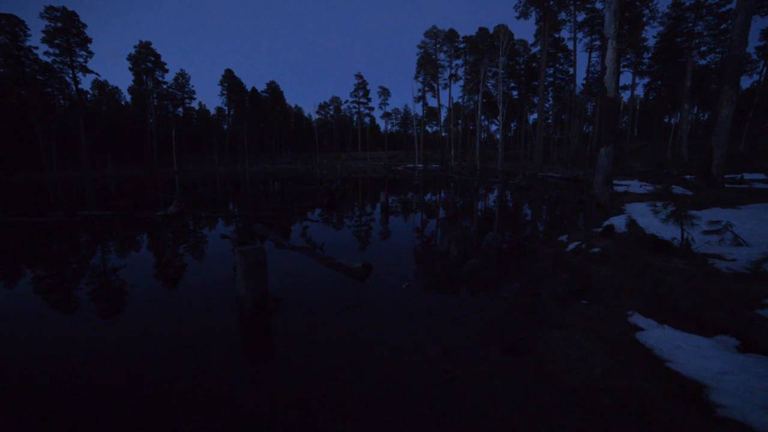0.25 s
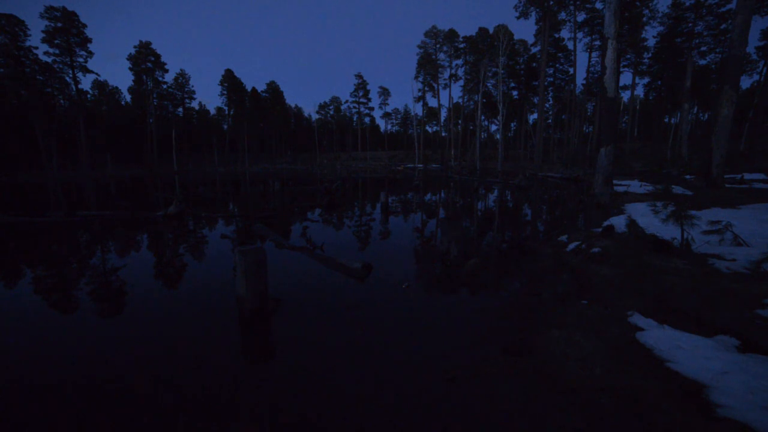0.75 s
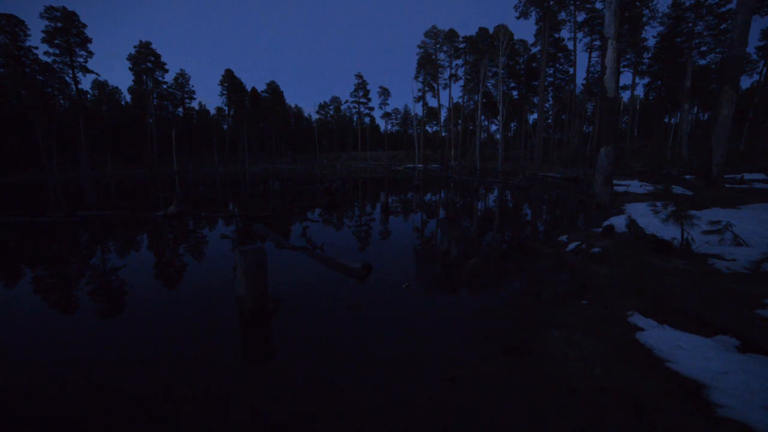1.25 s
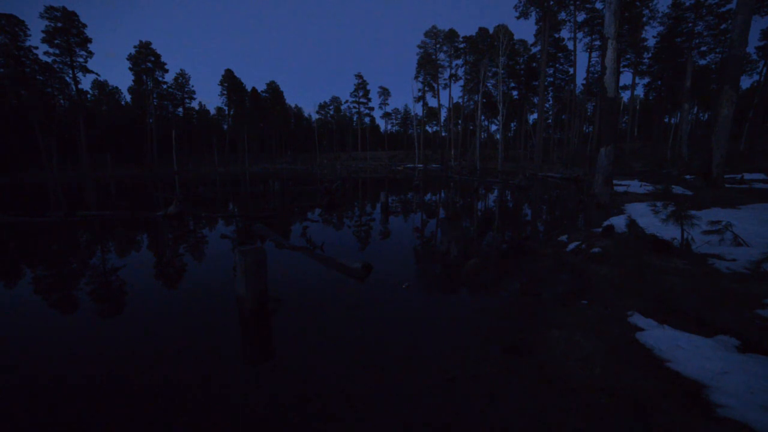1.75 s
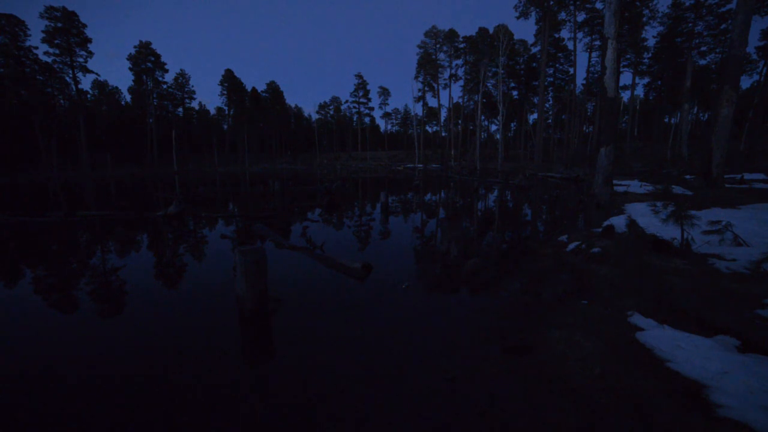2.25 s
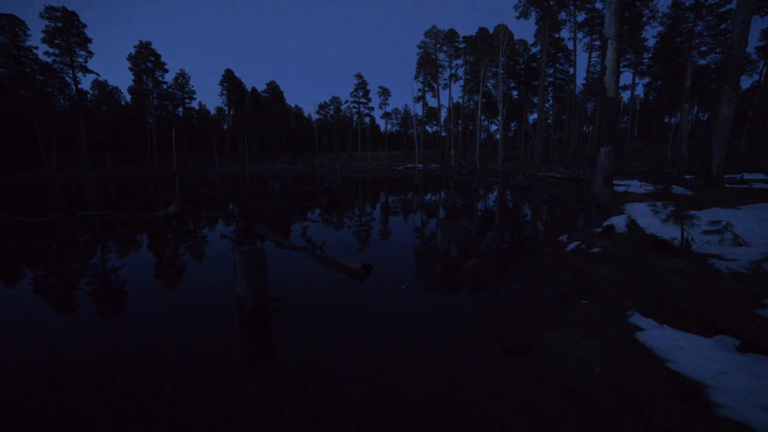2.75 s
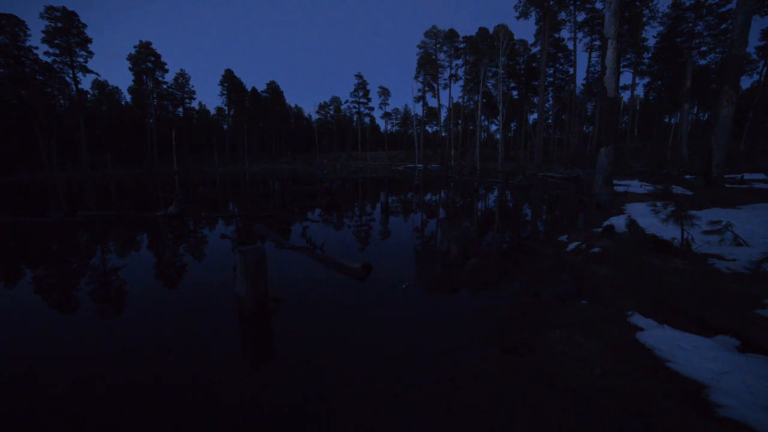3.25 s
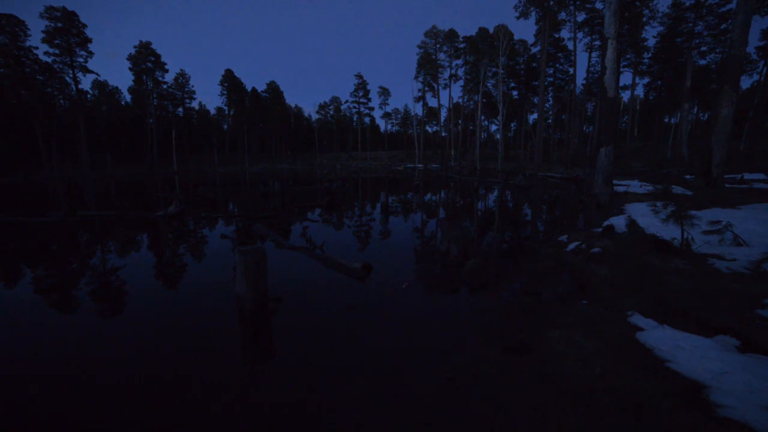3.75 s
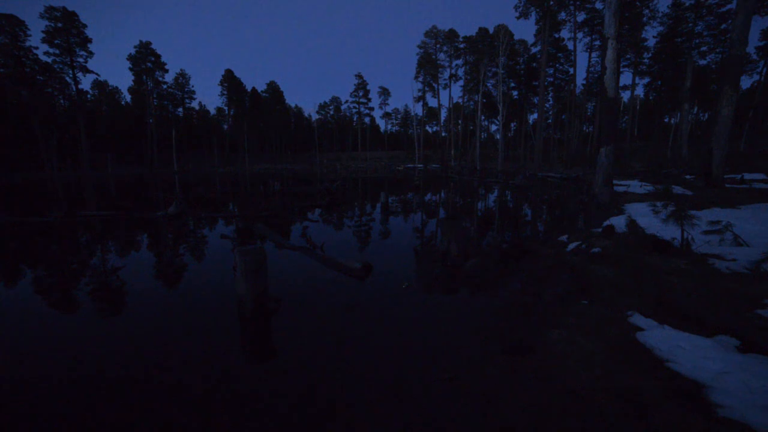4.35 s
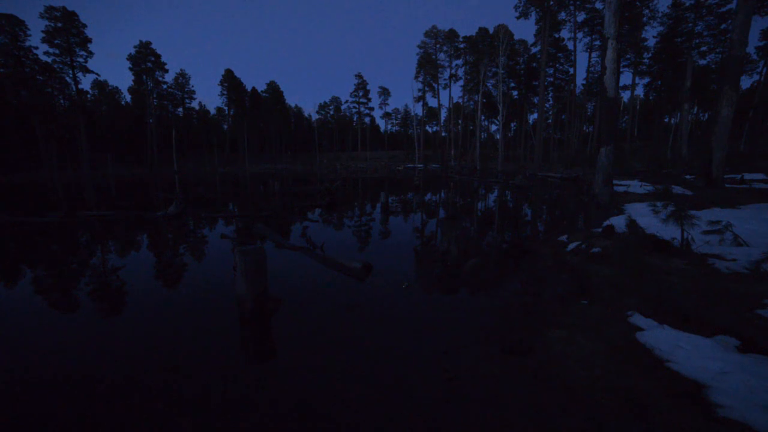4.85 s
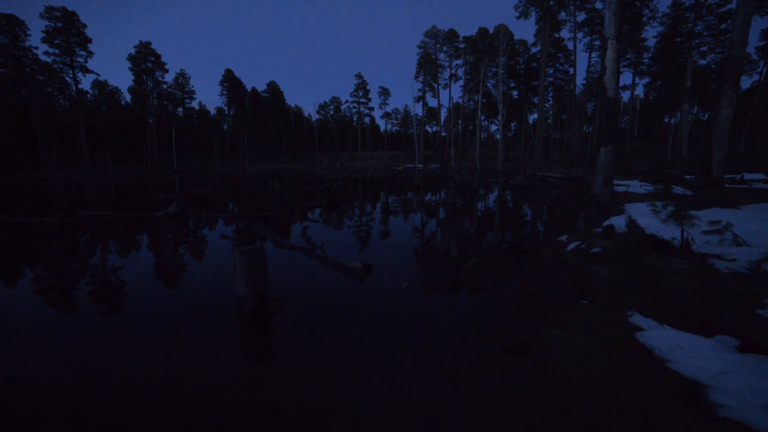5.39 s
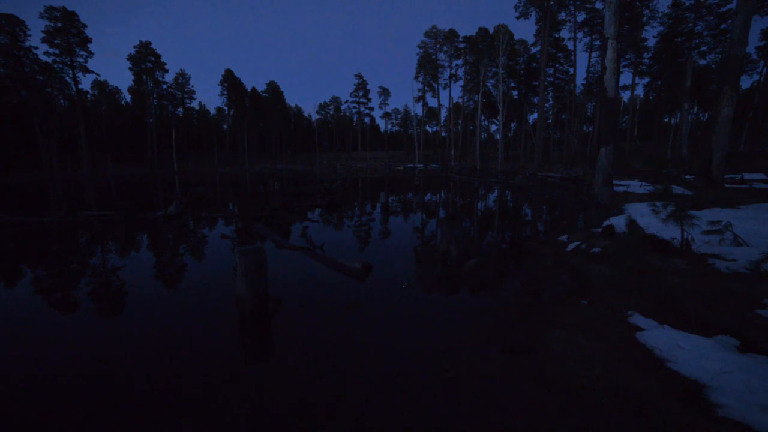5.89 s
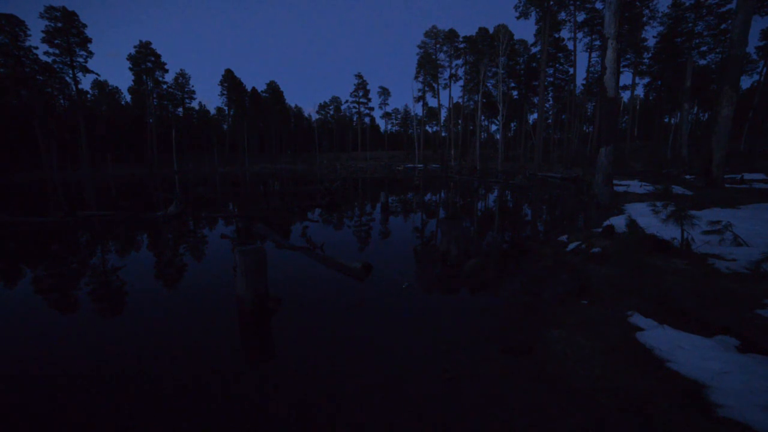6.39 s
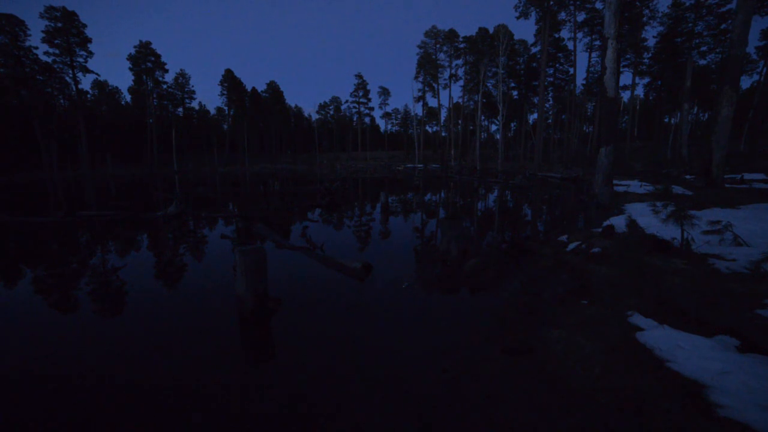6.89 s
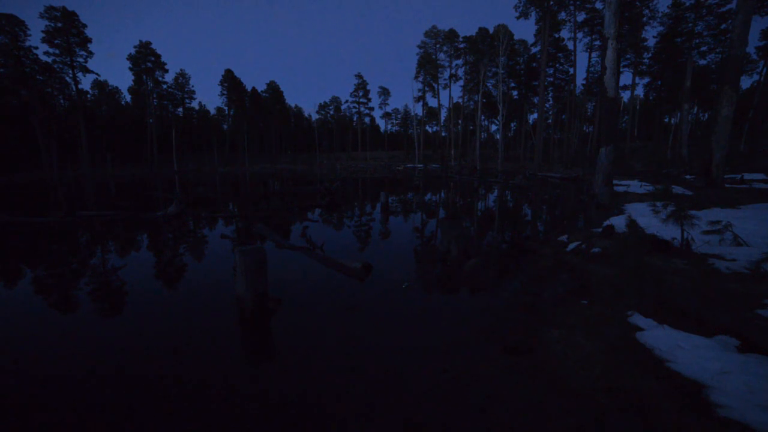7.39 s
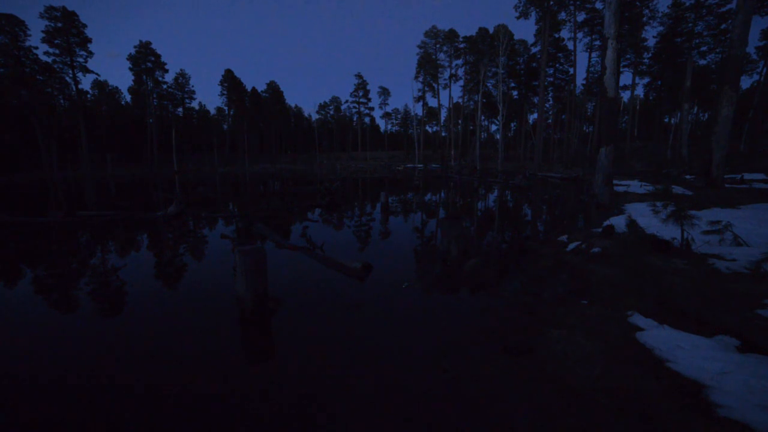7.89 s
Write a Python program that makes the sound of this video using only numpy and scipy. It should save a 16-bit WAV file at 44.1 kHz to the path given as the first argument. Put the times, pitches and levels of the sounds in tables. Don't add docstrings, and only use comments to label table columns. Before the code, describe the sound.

A crowd of small frogs around a forest pond trills continuously, their short piping pulses merging into a dense, high, grainy din. Nearer frogs overlap in trills that slow and rise in pitch, with sharp single peeps jumping out. Tree trunks return a soft echo. Very faint distant traffic and hiss lie beneath. Heard from a microphone on the bank.

```python
import sys
import numpy as np
from scipy import signal
from scipy.fft import rfft, irfft, next_fast_len
from scipy.io import wavfile
from scipy.ndimage import uniform_filter1d

SR = 44100
rng = np.random.default_rng(int(sys.argv[2]) if len(sys.argv) > 2 else 0)


def invert_db(level):
    return 10 ** (np.asarray(level, dtype=float) / 20)


def pcm_store(signal):
    levels = np.round(np.clip(np.atleast_2d(signal), -1, 1) * 32767)
    wavfile.write(sys.argv[1], SR, levels.astype(np.int16).T)


N = 358533

# time in seconds, level in dB, centre of the main band in Hz.
CROWD_CURVE = [(0.0, -26, 2470), (0.81, -26.5, 2470), (1.72, -26, 2480), (2.04, -24, 2487),
               (2.65, -26, 2546), (3.14, -27, 2455), (3.49, -25, 2520), (4.66, -26, 2461),
               (5.05, -23.5, 2523), (5.75, -25.5, 2489), (6.07, -25.5, 2454), (6.34, -24.5, 2490),
               (7.04, -26, 2497), (8.13, -25, 2482)]
BANKS = 14
TRILL_SLOWING = 0.2
NEAR_STRETCH = 1.68


def rms_one(x):
    return x / np.sqrt(np.mean(x ** 2) + 1e-20)


def in_time(rows):
    s, *columns = np.transpose(rows)
    return [np.interp(np.arange(N) / SR, s, column) for column in columns]


def coloured(spectrum):
    hz, db = np.transpose(spectrum)
    grid_hz = np.maximum(np.fft.rfftfreq(N, 1 / SR), 1)
    level_db = np.interp(np.log(grid_hz), np.log(hz), db, -60, db[-1])
    return rms_one(irfft(rfft(rng.standard_normal(N)) * invert_db(level_db), N))


def resonate(x, hz, width_hz):
    r = np.exp(-np.pi * width_hz / SR)
    b, a = [1, 0.0011, -1], [1, -2 * r * np.cos(2 * np.pi * hz / SR), r * r]
    return rms_one(signal.lfilter(b, a, signal.lfilter(b, a, x)))


def pulses(at_s, bank, gain, pitch_hz, upper_db, spread_db, droop, stretch=1):
    # band in Hz, level in dB, rise in ms, decay in ms, pitch scatter as a share.
    sac_bands = [
        (1240, -18, 0.63, 0.71, 0.11),
        (2470, -0.5, 0.59, 1.103, 0.026),
        (3706, -22.5, 0.73, 0.92, .06),
        (4980, -36.5, 1.1, 1.3, 0.011),
        (6200, -51, .5, 0.77, .05),
    ]
    ms = np.arange(560, dtype="f4") * np.float32(1000 / SR)
    bent_s = (ms - droop * np.log(np.cosh((ms - 4) / 3))) / 1000
    size = pitch_hz / sac_bands[1][0]
    draws = rng.standard_normal((len(at_s), len(sac_bands), 4))
    heard = (at_s > -ms[-1] / 1000) & (at_s < N / SR)
    at_s, bank, gain, size, draws = at_s[heard], bank[heard], gain[heard], size[heard], draws[heard]
    wave = 0
    for k, (hz, db, rise, decay, scatter) in enumerate(sac_bands):
        own_stretch = np.exp(0.099 * draws[:, 1, 2:3]).astype("f4")
        late = (ms - 4) / stretch * own_stretch + 0.6 * (k != 1)
        shape = np.where(late < 0, np.exp(-0.5 * (late / rise) ** 2), 1 / np.cosh(late / decay))
        tone_hz = hz * size * np.exp(1.472 * scatter * np.tanh(draws[:, k, 3]))
        phase = 2 * np.pi * (np.outer(tone_hz.astype("f4"), bent_s) + draws[:, k, 1:2].astype("f4"))
        level_db = db + (k != 1) * spread_db * draws[:, k, 0] + (k > 1) * upper_db
        band_gain = (gain * invert_db(level_db)).astype("f4")[:, None]
        wave = wave + band_gain * shape * np.sin(phase.astype("f4"))
    wave = wave * signal.windows.tukey(len(ms), 0.35)
    at = np.round(at_s * SR).astype(int)[:, None] + np.arange(len(ms))
    inside = (at >= 0) & (at < N)
    return np.bincount((at + N * bank[:, None])[inside], wave[inside], N * BANKS).reshape(BANKS, N)


def crowd(period_s=1.62, pulses_per_s=12.5, distance_db=1.73, size_spread=0.063, climb=0.096):
    frogs, calls_each, count = 110, 7, 11
    frog = rng.standard_normal((frogs, 4))[:, None, None, :]
    start = rng.random((frogs, 1, 1)) + np.arange(calls_each)[:, None] - 1
    start = start + 0.06 * rng.standard_normal((frogs, calls_each, 1))
    start_s = period_s * start * np.exp(0.05 * frog[..., 0])
    step = np.arange(count) / (count - 1)
    slip = rng.standard_normal((frogs, calls_each, count, 2))
    trill_s = count / pulses_per_s * np.exp(0.12 * frog[..., 1])
    at_s = start_s + trill_s * step * (1 - TRILL_SLOWING * (1 - step)) + 0.0015 * slip[..., 0]
    s, _, centre_hz = np.transpose(CROWD_CURVE)
    pitch_hz = np.interp(at_s, s, centre_hz)
    pitch_hz = pitch_hz * np.exp(size_spread * np.tanh(frog[..., 2]) + climb * (step - 0.6))
    gain = invert_db(distance_db * frog[..., 3] - 9.6 * (1 - step) ** 2 + 0.5 * slip[..., 1])
    bank = np.repeat(np.arange(frogs) % BANKS, calls_each * count)
    return pulses(at_s.ravel(), bank, gain.ravel(), pitch_hz.ravel(), 0, spread_db=1.5, droop=0.088, stretch=1.087)


def evened(x, over_s=0.22):
    return x / np.sqrt(uniform_filter1d(x ** 2, int(over_s * SR)) + 1e-12)


def dips_around(near_s, depth=0.6, dip_ms=3.0):
    marks = np.zeros(N)
    marks[np.clip(np.round((near_s - 0.001) * SR).astype(int), 0, N - 1)] = 1
    bell = np.exp(-0.5 * (np.arange(-999, 1000) / SR * 1000 / dip_ms) ** 2)
    return 1 - depth * np.minimum(signal.fftconvolve(marks, bell, "same"), 1)


def near_trills(upper_db=-3.7, count=12, climb_hz=148, uneven_db=2.5):
    # first pulse in seconds, last pulse in seconds, first pitch in Hz, peak in dB.
    nearest = [(0.168, 1.015, 2508, -13), (0.529, 1.4093, 2376, -16), (0.7256, 1.295, 2464, -11.5),
               (0.9907, 1.8644, 2330, -14), (1.2814, 2.035, 2367, -14), (1.4185, 2.214, 2340, -19.5),
               (1.6198, 2.5114, 2510, -16.5), (1.7872, 2.724, 2470, -19), (2.1078, 2.711, 2555, -16),
               (2.8064, 3.4473, 2364, -12.5), (3.2037, 3.9, 2386, -16.5), (3.357, 3.9248, 2376, -13),
               (3.378, 4.1835, 2490, -23), (3.6516, 4.5873, 2443, -15), (3.9158, 4.5086, 2330, -12),
               (4.5284, 5.141, 2390, -15.5), (4.7954, 5.5755, 2334, -11.5), (4.849, 5.8426, 2414, -20.5),
               (4.8975, 5.4003, 2467, -15.5), (5.086, 6.0543, 2460, -18), (5.3748, 6.4496, 2443, -13.5),
               (5.3786, 5.9131, 2440, -15), (6.1261, 6.6563, 2336, -19.5), (6.176, 6.7155, 2473, -14.5),
               (6.4173, 7.0682, 2350, -16), (6.5017, 7.2074, 2633, -18.5), (7.122, 7.7422, 2480, -13),
               (7.27, 7.9762, 2482, -12.5), (7.2752, 7.9801, 2490, -24), (7.3004, 8.0346, 2500, -17.5)]
    first, last, hz, db = np.transpose(nearest)[..., None]
    step = np.linspace(0, 1, count)
    s = (first + (last - first) * step * (1 - TRILL_SLOWING * (1 - step))).ravel()
    db = db - 3.0 + uneven_db * rng.standard_normal((len(nearest), count))
    bank = np.repeat(np.arange(len(nearest)) % BANKS, count)
    hz = (hz + climb_hz * step).ravel()
    return s, pulses(s - 0.004, bank, invert_db(db).ravel(), hz, upper_db, spread_db=0.5, droop=0.025,
                     stretch=NEAR_STRETCH)


def near_frogs():
    # time in seconds, peak in dB, pitch in Hz, upper bands in relative dB.
    loud_pulses = [(0.1019, -8.5, 2496, -34), (0.1427, -9, 2630, -25), (0.225, -16, 2390, -27.5),
                   (0.2331, -11, 2690, -36.5), (0.2541, -6.5, 2510, -34), (0.9457, -8.5, 2560, -34),
                   (1.0937, -12, 2540, -28), (1.4986, -13, 2490, -32), (1.8165, -9.5, 2485, -24),
                   (2.1534, -9.5, 2470, -34), (2.1742, -13, 2500, -33), (2.5453, -14.5, 2450, -28),
                   (3.3206, -11, 2530, -24), (3.5693, -8, 2470, -32), (4.0746, -13, 2465, -29),
                   (4.1585, -9, 2470, -30), (4.1683, -10.5, 2360, -37), (4.2096, -9, 2610, -36),
                   (4.322, -12, 2572, -26.5), (4.6513, -8.5, 2610, -26), (5.899, -8, 2466, -21.5),
                   (6.1184, -12, 2480, -23), (6.3248, -10, 2610, -27), (7.0142, -11, 2470, -32),
                   (7.0356, -13, 2480, -29.5), (7.5452, -15, 2480, -28), (7.9198, -13.5, 2440, -39),
                   (8.076, -8.5, 2495, -27), (8.0914, -12.5, 2660, -34), (8.1044, -15, 2540, -35)]
    s, peak_db, hz, upper_db = np.transpose(loud_pulses)
    bank = np.arange(len(s)) % BANKS
    return s, pulses(s - 0.004, bank, invert_db(peak_db - 3.1), hz, 0.5 * (upper_db + 23.5), spread_db=1.6,
                     droop=0.025, stretch=NEAR_STRETCH)


def soloists(bright_db=9):
    # first pulse in seconds, last pulse in seconds, pulses, first pitch in Hz, last pitch in Hz, level in dB.
    solos = [
        (1.537, 2.022, 6, 2750, 2940, -25.5),
        (2.257, 2.68, 6, 2540, 2590, -31.5),
        (3.309, 3.982, 9, 2720, 2710, -25.5),
        (4.898, 5.563, 9, 2660, 2930, -24),
        (2.683, 2.758, 3, 1950, 2030, -27.5),
        (6.341, 6.549, 6, 1980, 2070, -25.5),
        (7.862, 7.998, 4, 1950, 2070, -28),
    ]
    rows = [np.linspace((first, first_hz, db), (last, last_hz, db), round(count))
            for first, last, count, first_hz, last_hz, db in solos]
    s, hz, db = np.concatenate(rows).T
    return pulses(s - 0.002, np.arange(len(s)) % BANKS, invert_db(db), hz, bright_db, spread_db=0.0, droop=0.02)


def trees(banks, t60_s=0.95):
    s, size = np.arange(SR) / SR, next_fast_len(N + SR)
    tails = rng.standard_normal((BANKS, SR)) * invert_db(-60 * s / t60_s) * (s > 0.012)
    tails = signal.lfilter([1], [1, -0.6], tails)
    tails /= np.sqrt(np.mean(np.sum(tails ** 2, axis=1)))
    return irfft(np.sum(rfft(banks, size) * rfft(tails, size), axis=0), size)[:N]


def water_dip(x):
    dip_hz, width_hz, share, low_edge_hz = 1800, 330, 0.5, 925
    b, a = signal.iirpeak(dip_hz, dip_hz / width_hz, fs=SR)
    x = x - share * signal.lfilter(b, a, x)
    return signal.sosfilt(signal.butter(4, low_edge_hz, "high", fs=SR, output="sos"), x)


def high_caller(pitch_hz=4950, width_hz=320, pulses_per_s=150, edge_s=0.022):
    # start in seconds, end in seconds, first level in dB, last level in dB.
    high_calls = [
        (4.3, 4.462, -52, -54),
        (4.67, 4.829, -61, -49),
    ]
    clicks = (rng.random(N) < pulses_per_s / SR) + 0.051 * rng.standard_normal(N)
    s = np.arange(N) / SR
    calls = np.zeros(N)
    for start, end, first_db, last_db in high_calls:
        edges = np.clip(np.minimum(s - start, end - s) / edge_s + 1, 0, 1)
        calls += invert_db(np.interp(s, (start, end), (first_db, last_db))) * edges
    return calls * resonate(clicks, pitch_hz, width_hz)


def ticks():
    # time in seconds, peak in dB.
    twig_ticks = [
        (5.5628, -50),
        (7.8186, -44),
    ]
    clicks = np.zeros(N)
    for s, db in twig_ticks:
        clicks[round((s + 0.0015) * SR)] = invert_db(db + 18)
    return signal.sosfilt(signal.butter(3, [3500, 8500], "band", fs=SR, output="sos"), clicks)


def background():
    # frequency in Hz, density in dB per Hz.
    rumble_shape = [(60, -8.5), (100, 0.5), (190, 2.5), (260, -11), (400, -39.5), (900, -59.5), (2000, -93)]
    # time in seconds, level in dB.
    traffic_swell = [
        (0, -61.5),
        (1.2, -66.5),
        (3.1, -66),
        (3.5, -53.5),
        (3.85, -54.5),
        (4.1, -63),
        (7.2, -71),
        (7.7, -55.5),
        (8.13, -56),
    ]
    # frequency in Hz, density in dB per Hz.
    air_shape = [(25, -6), (45, -8.5), (120, 3), (300, -6), (700, -4), (1800, -1.5), (4500, -11.5),
                 (7000, -22.5), (11000, -25), (16000, -26)]
    s = np.arange(N) / SR
    hum_db = -61.5 - 1.5 * s
    drone_peak_s = 3.4
    drone_db = -60.5 - np.maximum(5.5 * (drone_peak_s - s), 2.5 * (s - drone_peak_s))
    hum = invert_db(hum_db) * resonate(rng.standard_normal(N), 100.6, 4)
    drone = invert_db(drone_db) * resonate(rng.standard_normal(N), 329, 62)
    swell = invert_db(in_time(traffic_swell)[0]) * resonate(rng.standard_normal(N), 200, 100)
    rumble = invert_db(-61) * coloured(rumble_shape)
    air = invert_db(-47) * coloured(air_shape)
    return rumble + swell + hum + drone + air


def scene():
    far = crowd()
    trill_s, trills = near_trills()
    single_s, singles = near_frogs()
    near = singles + soloists() + trills
    din = evened(rms_one(far.sum(axis=0)) + invert_db(-3) * rms_one(trees(far)))
    dips = dips_around(np.append(trill_s, single_s))
    din = invert_db(in_time(CROWD_CURVE)[0] + 1.47) * dips * din
    frogs = water_dip(din + near.sum(axis=0) + invert_db(-10.5) * trees(near))
    return (frogs + high_caller() + ticks() + background())[None]


def low_pass(x):
    return signal.sosfilt(signal.butter(12, 15750, fs=SR, output="sos"), x)


def record(dry):
    mix = dry * np.minimum((np.arange(N) + 20) / 40, 1)
    top_cut = signal.cheby2(12, 60, 15700 + 1100, fs=SR, output="sos")
    mix = signal.sosfilt(top_cut, mix)
    return low_pass(mix)


dry = scene()
out = record(dry)
pcm_store(out)
```